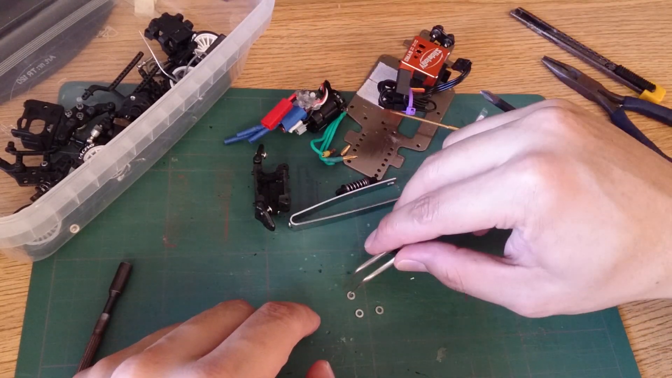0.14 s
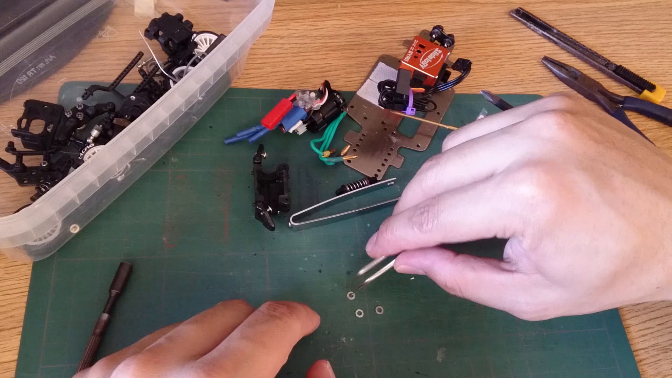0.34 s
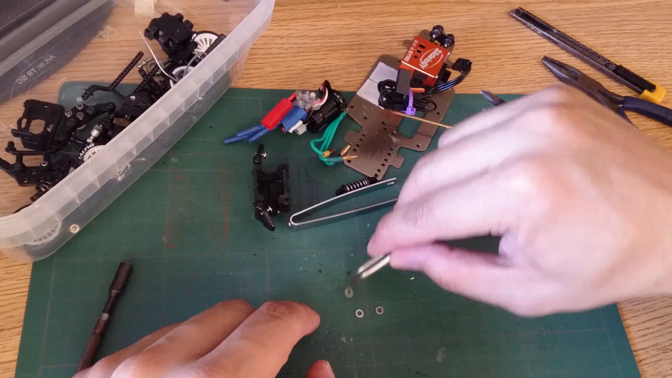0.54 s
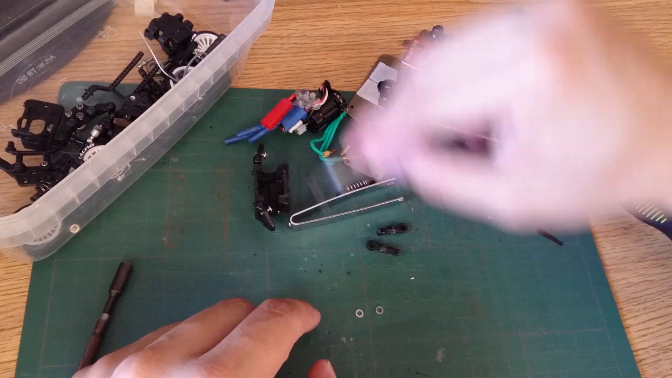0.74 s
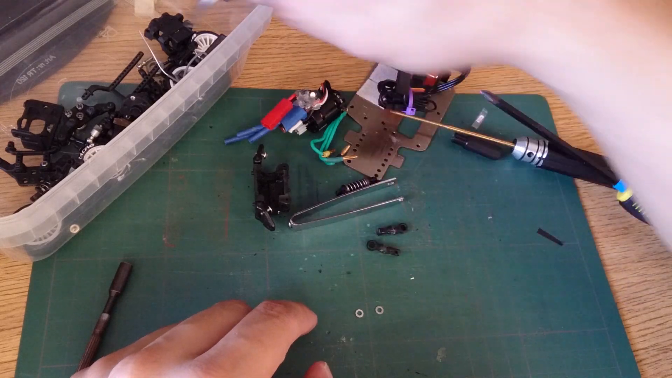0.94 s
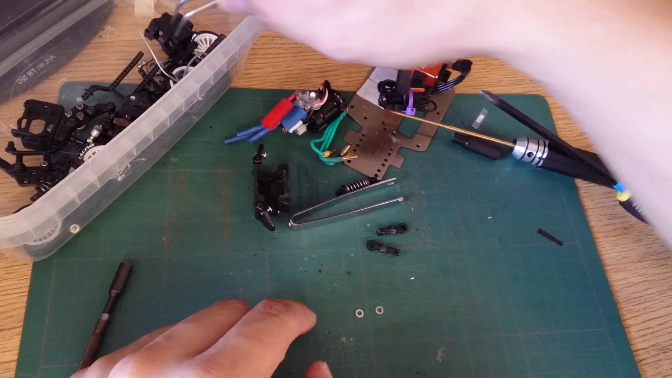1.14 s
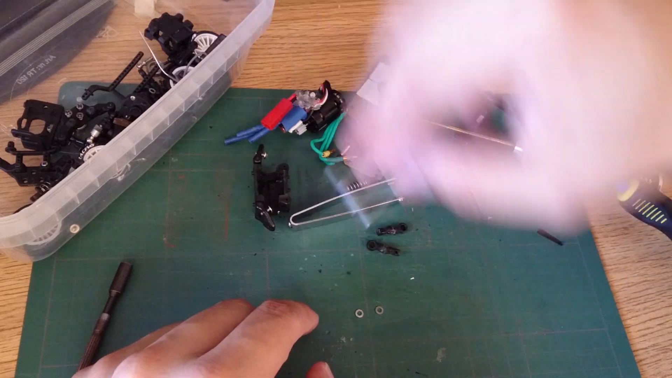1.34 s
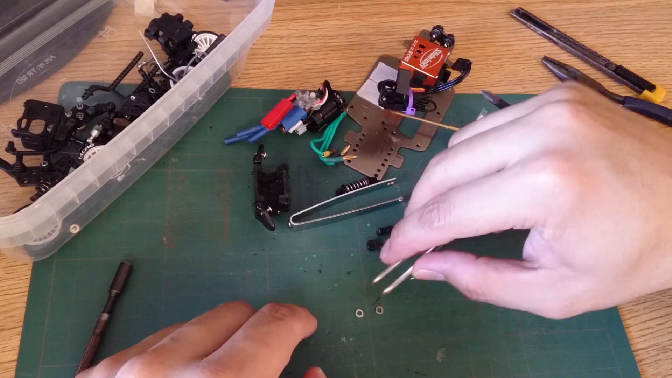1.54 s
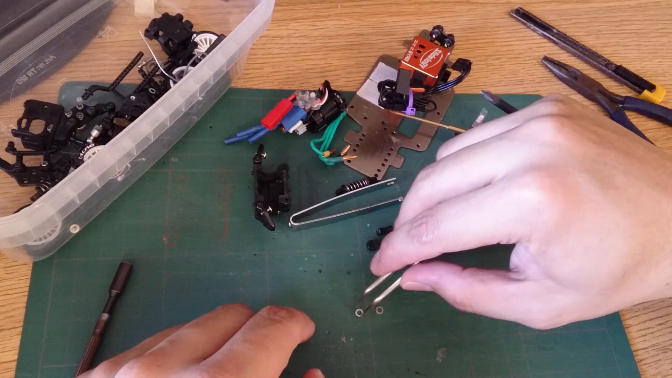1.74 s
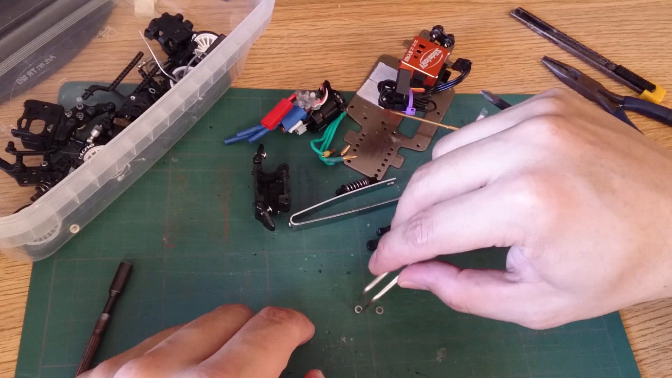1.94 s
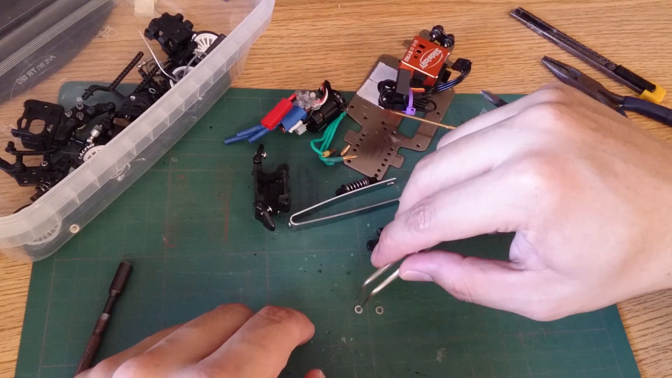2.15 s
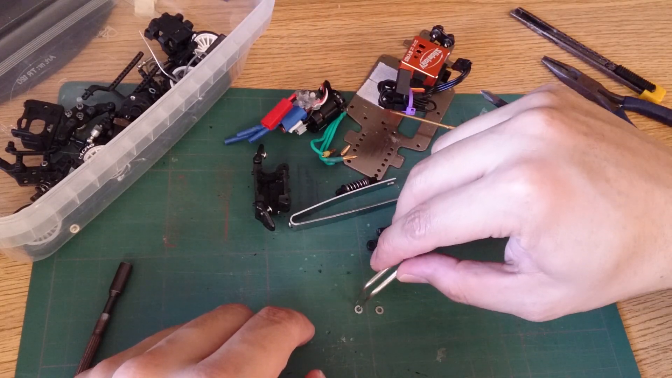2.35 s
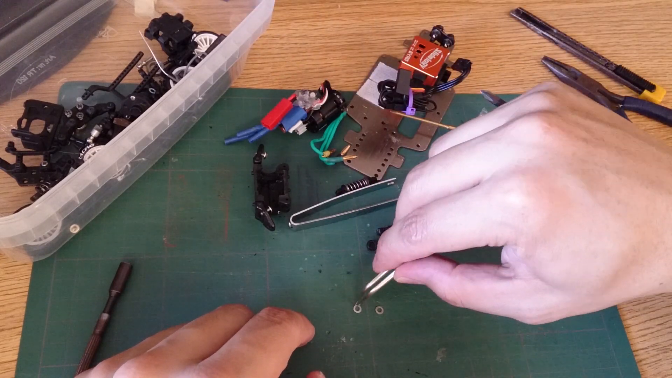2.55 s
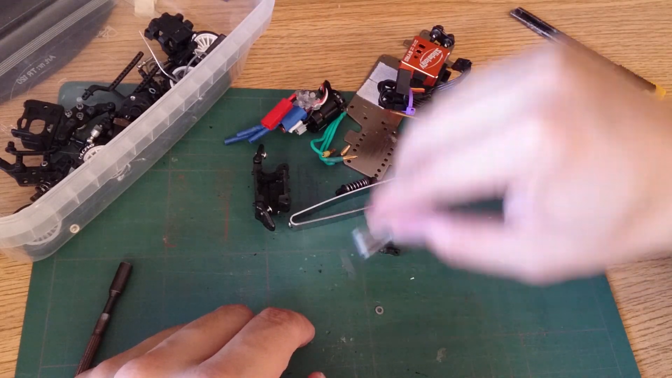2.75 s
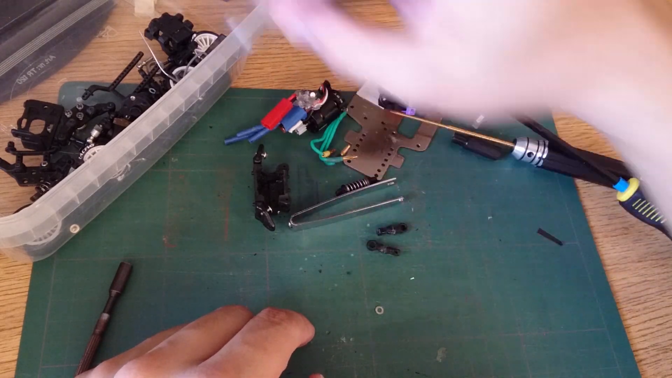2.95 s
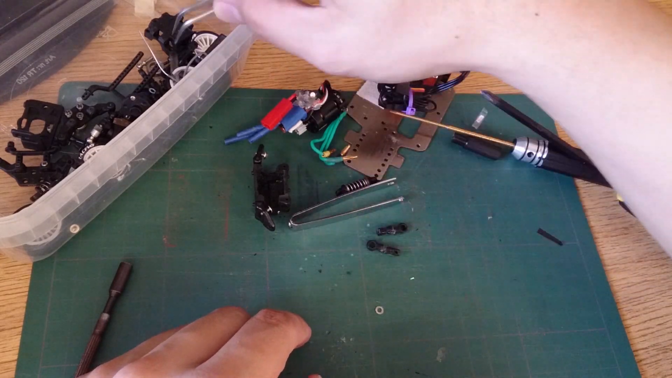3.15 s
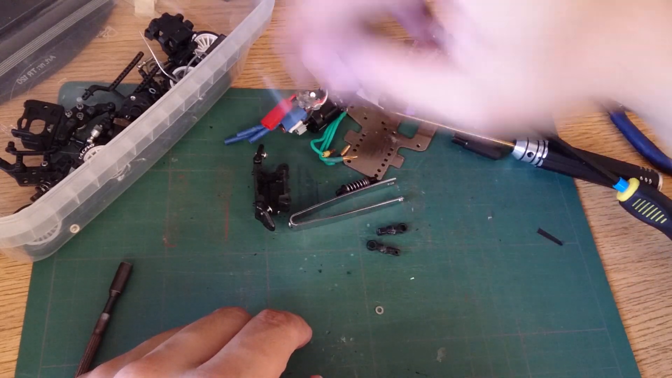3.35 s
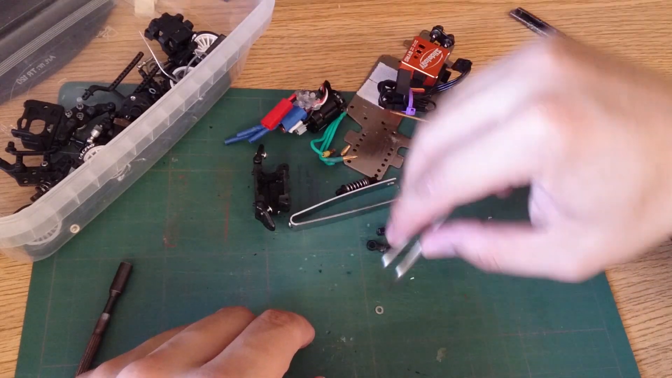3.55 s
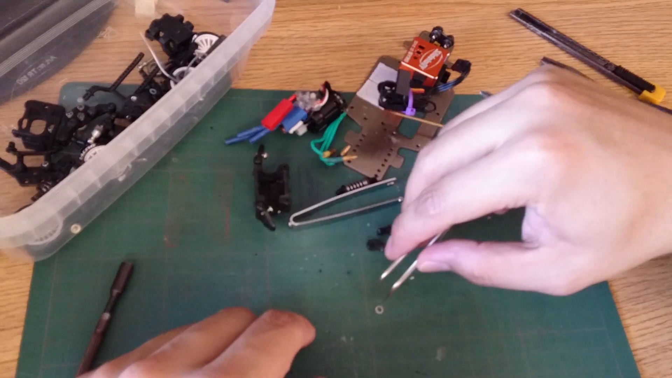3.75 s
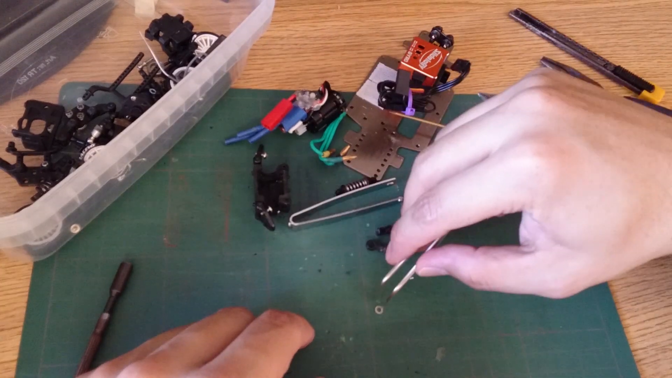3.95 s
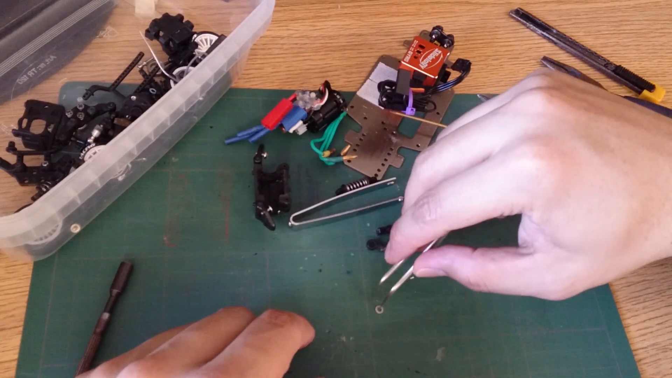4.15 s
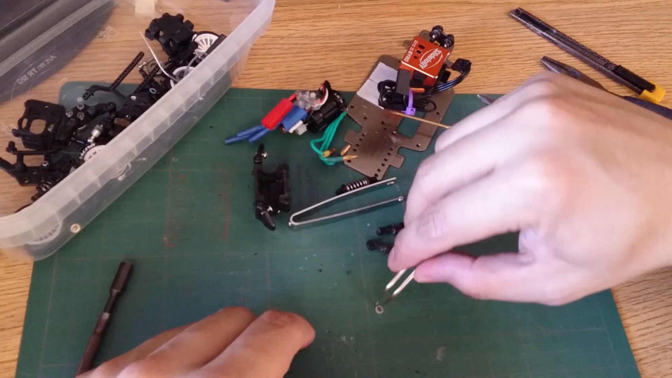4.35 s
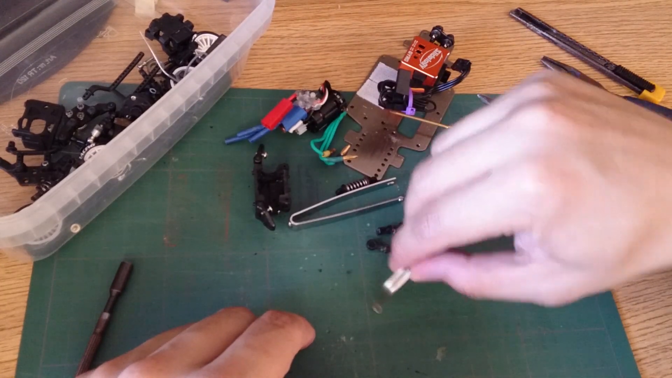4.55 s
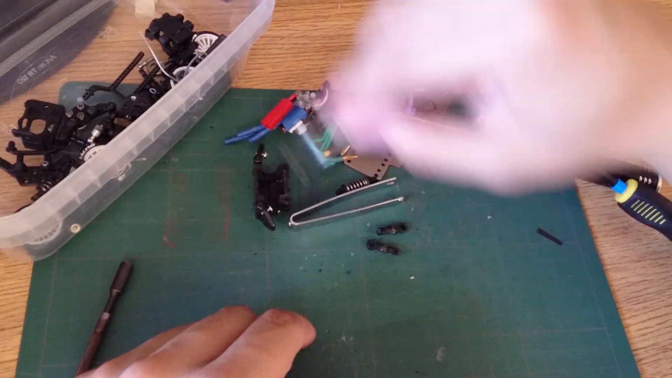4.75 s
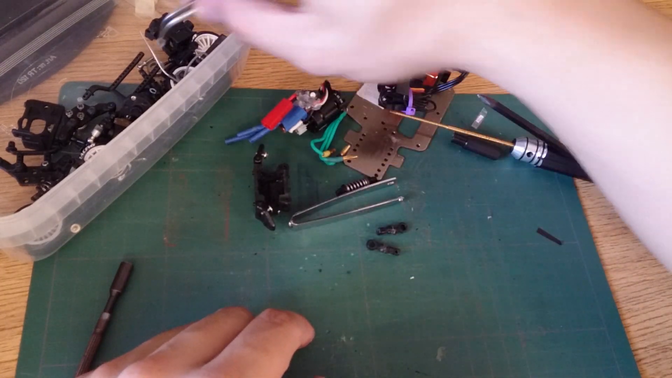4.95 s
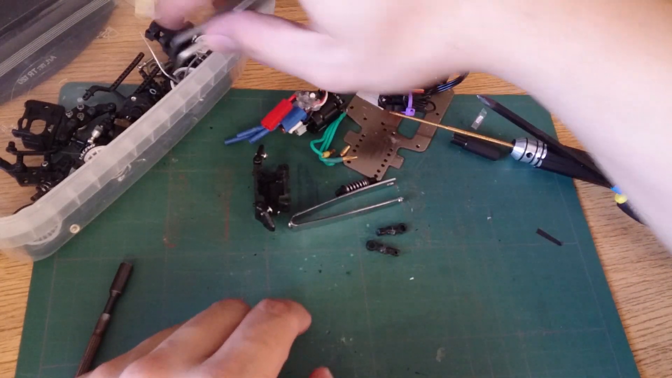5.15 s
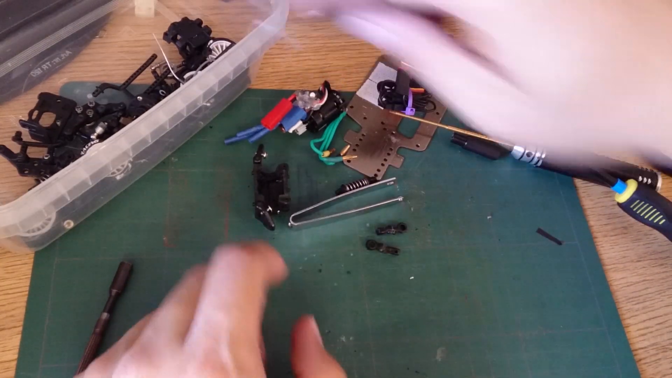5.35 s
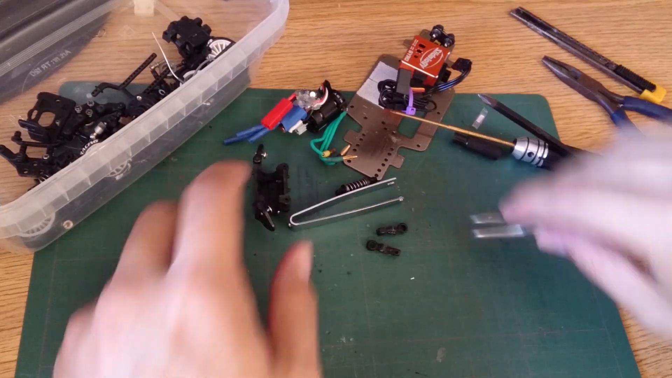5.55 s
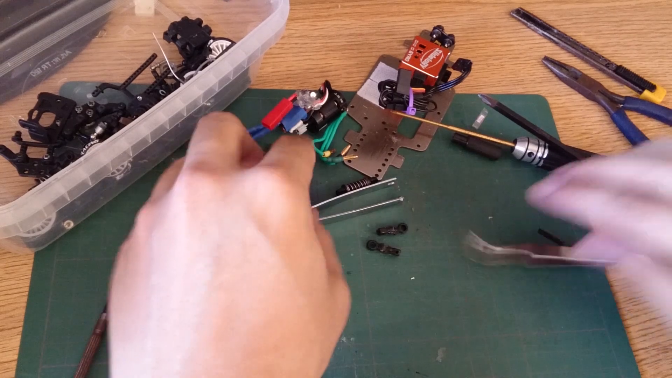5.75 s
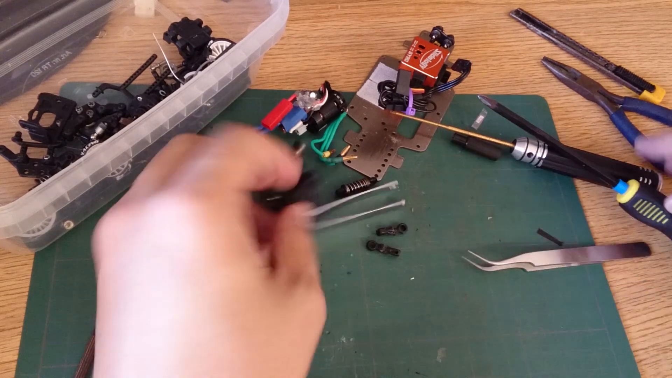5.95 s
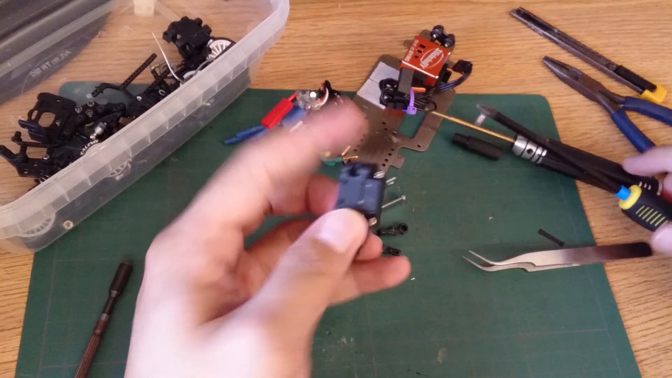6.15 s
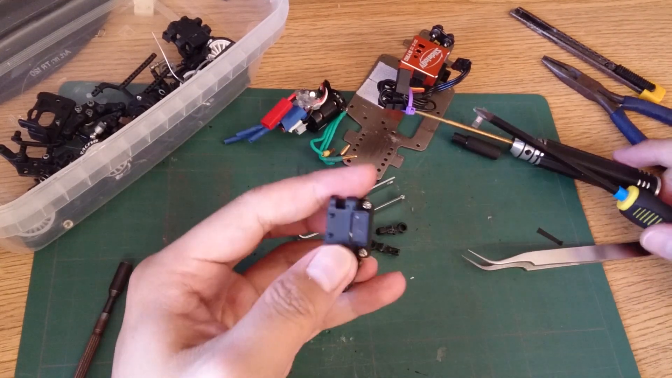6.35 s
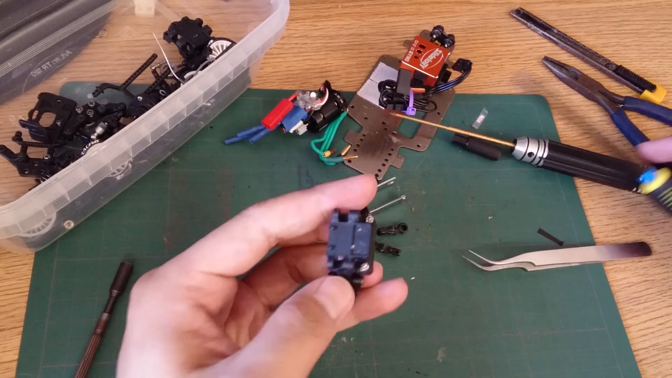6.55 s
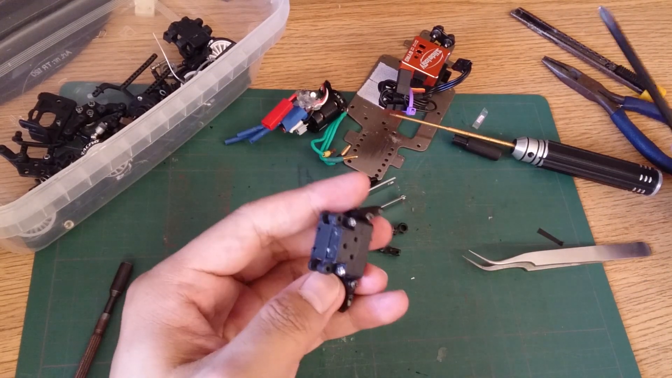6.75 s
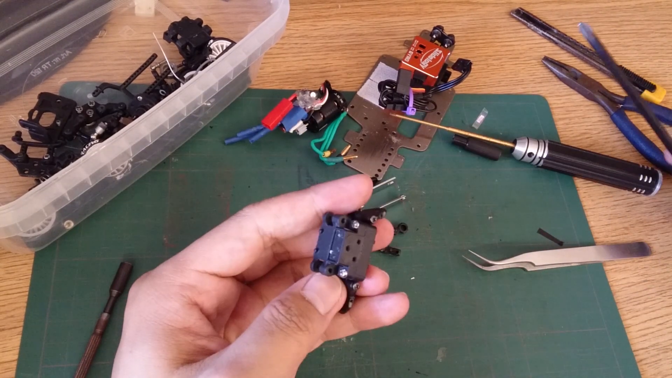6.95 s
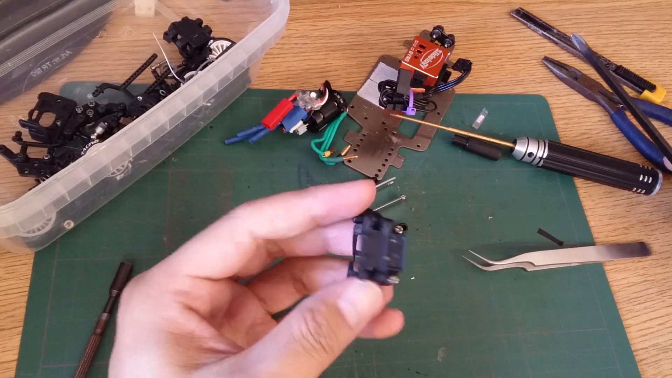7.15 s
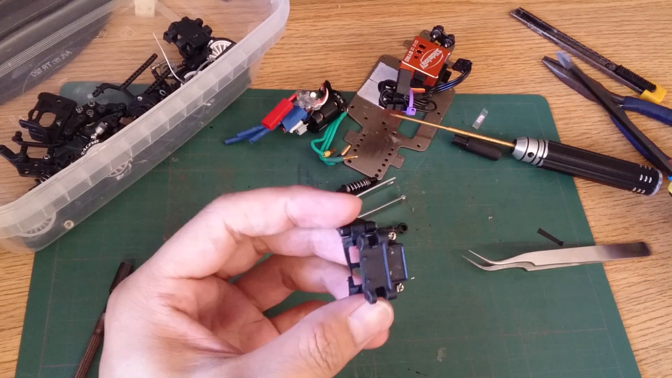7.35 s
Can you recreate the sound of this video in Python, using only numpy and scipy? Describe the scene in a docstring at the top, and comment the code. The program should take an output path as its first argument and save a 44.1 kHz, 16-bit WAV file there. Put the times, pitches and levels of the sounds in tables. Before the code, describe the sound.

A quiet room with low, steady air noise and barely audible hum, heard closely at a wooden desk. Tiny steel tweezer ticks come at about 0.26 and 0.6 s. At 1.26-1.3 s a tick leads into a dry plastic click with a small hop. Isolated ticks follow at 1.9 and 2.4 s, the latter with a dull low tap, then a faint flurry at 3.4-3.6 s and a tick at 4.4 s. From 5.25 to 5.47 s plastic parts crack and rattle into a tub, densest near 5.43. Another click at 5.76 precedes the loudest event, at 5.88: tweezers slap the mat, shake the desk, and bounce rapidly until about 6.14, ringing bright and metallic but quickly choked. Soft skin friction swells around 5.8-6.3 and 6.5-6.8 s. A light tick at 6.23, then dull knocks at 6.43 and 6.72, the second briefly hollow. A faint plastic click at 6.9, then room air.

```python
"""A wooden desk with a cutting mat in a quiet room: small parts are handled with steel tweezers.
The tips tick, plastic parts drop into a tub, and the tweezers are tossed down, bounce and ring.
Then a hand turns a toy chassis while another moves a tool with two dull knocks.
Contacts are short bursts of band-filtered decaying noise; bodies, steel arms and the desk ring as
decaying sines; skin friction and room air are coloured noise, with a faint hum underneath."""
import sys
import numpy as np
from scipy import signal
from scipy.fft import rfft, irfft
from scipy.io import wavfile

SR = 44100
rng = np.random.default_rng(int(sys.argv[2]) if len(sys.argv) > 2 else 0)


def persist_wave(psi):
    """Save psi, clipped to +-1, as 16-bit WAV."""
    counts = np.round(np.clip(psi, -1, 1) * 32767).astype(np.int16)
    wavfile.write(sys.argv[1], SR, np.atleast_2d(counts).T)


N = 326844
TIME = np.arange(N) / SR  # seconds
# a bank of narrow bands, evenly spaced in pitch (Hz)
EDGES = np.geomspace(22, 17000, 35)
CENTRES = np.sqrt(EDGES[1:] * EDGES[:-1])
BANK = [signal.butter(3, pair, "band", fs=SR, output="sos") for pair in zip(EDGES, EDGES[1:])]


def amp(db):
    """Decibels to gain."""
    return 10 ** (np.asarray(db) / 20)


def at_hz(points, hz):
    """Read a spectrum in dB, interpolated on a log-frequency axis."""
    point_hz, point_db = np.transpose(points)
    return np.interp(np.log(hz), np.log(point_hz), point_db)


def fade(t60, size):
    """Exponential decay that falls 60 dB in t60 seconds."""
    return np.exp(-np.log(1000) * TIME[:size] / t60)


def add(track, start_s, sound):
    """Mix a sound into a track at a time."""
    start = int(start_s * SR)
    track[start:start + len(sound)] += sound[:N - start]


def ring(hz, t60, size):
    """One struck mode: a decaying sine."""
    return np.sin(2 * np.pi * hz * TIME[:size]) * fade(t60, size)


def dense_modes(band_db, band_t60, size):
    """Countless overlapping modes: noise that dies band by band, each band holding a set energy."""
    out = np.zeros(size)
    heard_db = np.max(band_db) - 50  # weaker bands are skipped
    noises = rng.standard_normal((len(BANK), size))
    for sos, width_hz, db, t60, noise in zip(BANK, np.diff(EDGES), band_db, band_t60, noises):
        if db > heard_db:
            band = signal.sosfilt(sos, noise * fade(t60, size) + 1e-18)
            # energy in proportion to bandwidth: equal dB give a flat spectrum
            unit_gain = np.sqrt(2 * width_hz / SR / np.sum(band ** 2))
            out += amp(db) * band * unit_gain
    return out


def contact(band_db, t60, damping, size=1400):
    """A small object is struck; its high modes die sooner than its low ones."""
    # t60 holds at the eighth band from the top, about 3.9 kHz
    band_t60 = t60 * (CENTRES / CENTRES[-8]) ** -damping
    return dense_modes(band_db, band_t60, size)


def hump_db(hz, octaves):
    """A cluster of modes round one pitch, with steep skirts."""
    distance = np.abs(np.log2(CENTRES / hz) / octaves)
    return -20 * np.log10(1 + distance ** 3)


def softness_db(cut_hz):
    """A longer contact cannot excite the highest modes."""
    return -10 * np.log10(1 + (CENTRES / cut_hz) ** 5)


def smallness_db(lowest_hz):
    """A small part radiates little below its lowest mode."""
    return -10 * np.log10(1 + (lowest_hz / CENTRES) ** 4)


def tap(db, hz, octaves, t60, damping, cut_hz):
    """A light touch with one broad resonance."""
    return contact(db + hump_db(hz, octaves) + softness_db(cut_hz), t60, damping)


def steady_noise(spectrum):
    """Coloured noise of rms 1."""
    hz = np.maximum(np.arange(N // 2 + 1) * SR / N, 1)
    white = rfft(rng.standard_normal(N))
    noise = irfft(white * amp(at_hz(spectrum, hz)), N)
    return noise / np.std(noise)


def background(air_db=-64):
    """Room air and ventilation as steady coloured noise, with a faint hum of fixed sines."""
    # colour of the air: pitch_hz [Hz], relative density_db [dB per Hz]
    air_colour = [(25, -19), (48, -5.5), (65, -1), (100, -5.5), (210, -2), (300, -5), (500, -3), (850, -1),
                  (1200, -5.5), (2500, -10.5), (4700, -16), (7000, -23), (9500, -32.5), (12000, -44),
                  (14000, -64)]
    # hum partials: pitch_hz [Hz], level_db [dB rms]
    hum_partials = [(59.2, -92), (215.3, -78.5), (495.3, -79)]
    out = amp(air_db) * steady_noise(air_colour)
    for hz, db in hum_partials:
        phase = rng.random()  # in cycles
        out += amp(db) * np.sqrt(2) * np.sin(2 * np.pi * (hz * TIME + phase))
    return out


def ticks(reference_octaves=.22, reference_hz=5000, widening=0.97):
    """Steel tips close on tiny parts: light taps, each with one broad resonance."""
    # tweezer tips and tiny parts touching: start_s [s], level_db [dB], pitch_hz [Hz]
    tip_touches = [(0.2638, -19, 4900), (0.2652, -37, 8500), (0.6015, -34, 15000), (1.2564, -20, 6130),
                   (1.939, -26.5, 4860), (2.4185, -17, 5140), (3.3598, -27, 6700), (3.3896, -37, 8850),
                   (3.39, -39, 14500), (3.4057, -33.5, 7800), (3.476, -32, 6850), (3.536, -33, 7900),
                   (3.586, -32.5, 7650), (4.3989, -24, 4800), (4.603, -48, 13500), (6.2284, -21, 6530)]
    out = np.zeros(N)
    for start_s, db, hz in tip_touches:
        # a higher tick covers a wider band
        octaves = reference_octaves * (hz / reference_hz) ** widening
        add(out, start_s, tap(db, hz, octaves, t60=0.013, damping=.1, cut_hz=30000))
    return out


def knocks(octaves=0.68, rock_s=.016, rock_loss_db=4, rock_pitch_ratio=.7):
    """A tool touches down dully, then rocks back once on its grip, softer and lower."""
    # dull knocks of tools on the mat and the desk: start_s [s], level_db [dB], pitch_hz [Hz]
    touchdowns = [(0.264, -24, 1100), (1.259, -28, 1200), (2.419, -19.5, 400), (6.426, -15, 1550),
                  (6.723, -12, 1290)]
    out = np.zeros(N)
    rocks = [(start_s + rock_s, db - rock_loss_db, hz * rock_pitch_ratio) for start_s, db, hz in touchdowns]
    for start_s, db, hz in touchdowns + rocks:
        add(out, start_s, tap(db, hz, octaves, t60=0.014, damping=0.16, cut_hz=4500))
    return out


def plastic_parts(t60=0.021, damping=0.2, clack_t60=0.015, knock_db=-29, knock_t60=0.012,
                  note_db=-50, note_t60=0.034):
    """Each landing: a dry crack, a clack of the part, a hollow knock of the wall or mat, then one hop."""
    # plastic parts landing: start_s [s], level_db [dB], lowest_mode_hz [Hz], body_pitch_hz [Hz],
    # body_db [dB, relative], clack_pitch_hz [Hz], clack_db [dB], hop_after_s [s]
    landings = [(1.29, -11.5, 1300, 1264, 2.5, 2920, -10, .0325),
                (1.3867, -30.5, 4100, 1280, -32, 3100, -38, .012),
                (3.5394, -31.5, 1800, 2000, -24, 2000, -27, .045),
                (5.2531, -17.5, 2500, 1280, -7.5, 3680, -10.5, .003),
                (5.3178, -6.5, 4730, 1870, -5, 740, -8, 0.024),
                (5.3724, -12.5, 2400, 1930, -13, 4040, -15, .011),
                (5.4263, -6.5, 250, 1410, -3, 1900, -3, .003), (5.4293, -8, 400, 1100, -2, 3600, -5, .011),
                (5.4345, -9, 500, 2040, 1.5, 1400, -6, .029), (5.4448, -16, 800, 1420, -1, 2080, -12, .047),
                (5.4507, -8, 800, 1430, 1, 2300, -5.5, 0.012),
                (5.4552, -7.5, 900, 1220, 0, 3640, -6.5, 0.043),
                (5.465, -20, 800, 1420, -3, 1200, -6, .029),
                (5.7572, -10.5, 3850, 1400, -8, 700, -13, .009),
                (6.902, -27.5, 1100, 2470, -23, 1300, -26, .02)]
    # colour of a hard plastic contact: pitch_hz [Hz], level_db [dB]
    plastic_colour = [(80, 1), (300, 2.5), (650, 4), (1300, 4.5), (2100, -0.5), (2800, -1.5), (3700, -3),
                      (5000, -1), (6900, -3), (9000, -11), (12000, -21.5), (16000, -9)]
    cut_hz = 9800  # hardness of plastic on plastic
    clack_octaves = 0.3
    # each part lands again on an edge: a weaker, thinner click
    hop_loss_db, hop_lowest_hz = 13.5, 2620
    out, size = np.zeros(N), SR // 4

    def crack(db, lowest_hz):
        """Plastic clicks on plastic."""
        colour_db = at_hz(plastic_colour, CENTRES) + smallness_db(lowest_hz) + softness_db(cut_hz)
        return contact(db + colour_db, t60, damping)

    for start_s, db, lowest_hz, body_hz, body_db, clack_hz, clack_db, hop_s in landings:
        add(out, start_s, crack(db, lowest_hz))
        add(out, start_s, tap(clack_db, clack_hz, clack_octaves, clack_t60, damping, cut_hz))
        # the body swings up over its first cycle, loses most of its energy at once and rings on faintly
        body = amp(knock_db) * ring(body_hz, knock_t60, size)
        body += amp(note_db) * ring(body_hz, note_t60, size)
        swing_up = np.minimum(TIME[:size] * body_hz, 1)
        add(out, start_s, amp(body_db) * body * swing_up)
        add(out, start_s + hop_s, crack(db - hop_loss_db, hop_lowest_hz))
    return out


def desk(board_hz=2300, board_octaves=0.71, board_t60=0.43):
    """Under the heavier blows the desk booms faintly and its board clatters for a moment."""
    # blows that shake the desk: start_s [s], boom_db [dB], clatter_db [dB]
    blows = [(5.427, -57.5, -27), (5.883, -54, 7)]
    # desk top: pitch_hz [Hz], level_db [dB re the boom], t60_s [s]
    boom_modes = [(59.6, -8, 1), (77, 0.5, 0.45), (113, -3, 0.57), (147.5, -0.5, 0.29), (233, 2, 0.27)]
    # the board's own notes: pitch_hz [Hz], level_db [dB re its clatter], t60_s [s]
    board_notes = [(1000, -49, .1), (1080, -41, 0.13), (1410, -41, .08), (1930, -44, .1), (2115, -42, .07),
                   (2260, -37, 0.0447)]
    out = np.zeros(N)
    boom = sum(amp(db) * ring(hz, t60, size=SR) for hz, db, t60 in boom_modes)
    notes = sum(amp(db) * ring(hz, t60, size=SR) for hz, db, t60 in board_notes)
    for start_s, boom_db, clatter_db in blows:
        add(out, start_s, amp(clatter_db) * notes)
        add(out, start_s, amp(boom_db) * boom)
        clatter_band_db = clatter_db + hump_db(board_hz, board_octaves)
        add(out, start_s, contact(clatter_band_db, board_t60, damping=.1, size=4096))
    return out


def fingers(attack_s=.2, release_s=0.25):
    """Skin slides on the chassis: each stroke of soft friction noise swells, holds and fades."""
    # strokes: start_s of the hold [s], hold_s [s], level_db [dB rms]
    strokes = [(5.84, 0.42, -62), (6.522, 0.3, -63.5)]
    # colour of the rub: pitch_hz [Hz], relative density_db [dB per Hz]
    rub_colour = [(50, 2.5), (150, 3), (450, 2.5), (900, -0.5), (1600, -10.5), (4000, -15), (12000, -43)]
    pressure = np.zeros(N)
    for start_s, hold_s, db in strokes:
        end_s = start_s + hold_s
        corners_s = [start_s - attack_s, start_s, end_s, end_s + release_s]
        pressure += amp(db) * np.interp(TIME, corners_s, [0, 1, 1, 0])
    return pressure * steady_noise(rub_colour)


def tweezer_touches(bounce_db=2, loss_db_per_s=138):
    """The flat landing with a dull slap, then ever weaker bounces on the edges."""
    # bounces: start_s [s], lowest_mode_hz [Hz], contact_cut_hz [Hz], arm_ring_db [dB]
    edge_bounces = [(5.9254, 3500, 9500, -47), (5.9530, 1900, 15000, -36.5), (5.974, 3800, 11000, -44),
                    (6.0013, 2400, 8500, -48), (6.0208, 4000, 18000, -44), (6.044, 3500, 8000, -74),
                    (6.1052, 2820, 6440, -79), (6.1427, 2800, 6500, -78)]
    # start s, level dB, lowest mode Hz, contact cut-off Hz, arm ring dB
    touches = [(5.8814, 12.5, 300, 3160, -32.5)]
    first_s = edge_bounces[0][0]
    for start_s, lowest_hz, cut_hz, ring_db in edge_bounces:
        db = bounce_db - loss_db_per_s * (start_s - first_s)
        touches.append((start_s, db, lowest_hz, cut_hz, ring_db))
    return touches


def tweezers_dropped(t60=0.018, damping=0.15, spread_db=2.5, mistuning=0.0026, choke_db=11.0):
    """The handle slaps the mat, then the arms clash and ring, differently on every bounce."""
    # free steel arms: pitch_hz [Hz], level_db [dB re the ring], t60_s [s]
    arm_modes = [(1640, -5, 0.17), (2231, -6, 0.064), (2490, -9, 0.2), (3030, -2, .2), (3210, -5.5, 0.15),
                 (3480, -8, 0.11), (3630, -8, 0.24), (4021, -5.5, .22), (4700, -15, .24), (5700, -10, .14),
                 (6330, -1, 0.31), (6840, -9, 0.31), (8764, -14, 0.18), (9800, -11, 0.13),
                 (10440, -6.5, 0.085), (11045, -11, 0.17), (11760, -18, .15), (12450, -12, .1),
                 (13350, -13, .07), (14480, -6, .14), (15600, -10, .08)]
    # colour of steel on the mat: pitch_hz [Hz], level_db [dB]
    mat_colour = [(80, -10), (280, -8), (560, -9.5), (1050, 2), (2300, 2.5), (3400, 3), (4800, -1.5),
                  (6600, -1), (10000, -13.5), (13000, -23), (16000, -9)]
    # at every touch the far end comes down just after the near one
    far_end_s, far_end_loss_db = 0.0063, 9
    out, size = np.zeros(N), SR // 2
    touches = tweezer_touches()
    times = np.array(touches)[:, 0]
    for start_s, db, lowest_hz, cut_hz, ring_db in touches:
        blow_db = smallness_db(lowest_hz) + softness_db(cut_hz)
        slap_db = db + at_hz(mat_colour, CENTRES) + blow_db
        add(out, start_s, contact(slap_db, t60, damping))
        add(out, start_s + far_end_s, contact(slap_db - far_end_loss_db, t60, damping))
        # every later touch of the mat takes some of the ring away
        later_touches = np.searchsorted(times[times > start_s], start_s + TIME[:size])
        choke = amp(-choke_db * later_touches)
        for hz, mode_db, mode_t60 in arm_modes:
            strength_db = ring_db + mode_db + np.interp(hz, CENTRES, blow_db)
            strength_db += spread_db * rng.standard_normal()
            # the pitch shifts a little with the way the arms lie
            pitch_hz = hz * (1 + mistuning * rng.standard_normal())
            polarity = rng.choice([-1, 1])
            add(out, start_s, polarity * amp(strength_db) * choke * ring(pitch_hz, mode_t60, size))
    return out


def tool_handle(contact_t60=0.004):
    """The hollow handle rings briefly; its soft grip eases the attack."""
    # the handle set down on the desk: start_s [s], level_db [dB]
    set_downs = [(6.7234, -43)]
    # handle modes: pitch_hz [Hz], level_db [dB, relative], t60_s [s]
    hollow_modes = [(800, -5, 0.051), (860, 4.5, 0.097), (1350, -2.5, 0.08), (1990, -7, .04),
                    (4550, -15, 0.044)]
    out, size = np.zeros(N), SR // 4
    note = sum(amp(db) * ring(hz, t60, size) for hz, db, t60 in hollow_modes)
    for start_s, db in set_downs:
        add(out, start_s, amp(db) * note * (1 - fade(contact_t60, size)))
    return out


def room(x, near_delay=.004, near_db=-11, near_t60=0.088, wall_delay=.008, wall_t60=0.37, absorb_hz=13000):
    """Things on the desk scatter the sound first; the walls then return a short tail, treble dying first."""
    # colour of the tail: pitch_hz [Hz], level_db [dB]
    tail_colour = [(100, 5), (500, -10), (1200, -10.5), (3000, -12), (7000, -10.5), (16000, -10)]
    response = np.zeros(SR)
    scatter = contact(np.zeros(len(CENTRES)), near_t60, damping=0.11, size=4096)
    add(response, near_delay, amp(near_db) * scatter)
    band_t60 = wall_t60 / np.sqrt(1 + (CENTRES / absorb_hz) ** 2)
    add(response, wall_delay, dense_modes(at_hz(tail_colour, CENTRES), band_t60, size=SR // 2))
    return signal.fftconvolve(x, response)[:N]


def scene():
    """The hits sound in the room; the desk, the fingers and the air are mixed in without its tail."""
    hits = ticks() + knocks() + plastic_parts() + tweezers_dropped() + tool_handle()
    return (hits + room(hits) + desk() + fingers() + background())[None]


def record(dry, low_cut_hz=46, top_cut_hz=15800):
    """The microphone ripples in the treble and drops the deepest bass; the top is cut steeply."""
    # microphone peaks and dips: pitch_hz [Hz], gain_db [dB], q [ratio]
    ripples = [(7260, 3.5, 10), (7640, -7, 5.4), (8770, 2, 13)]
    out = signal.sosfilt(signal.butter(4, low_cut_hz, "high", fs=SR, output="sos"), dry)
    for hz, db, q in ripples:
        resonance = signal.lfilter(*signal.iirpeak(hz, q, fs=SR), out)
        out = out + (amp(db) - 1) * resonance
    # 0.1 dB passband ripple, 70 dB stopband
    return signal.sosfilt(signal.ellip(10, .1, 70, top_cut_hz, fs=SR, output="sos"), out)


dry = scene()
out = record(dry)
persist_wave(out)
```